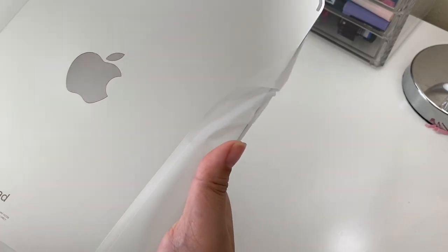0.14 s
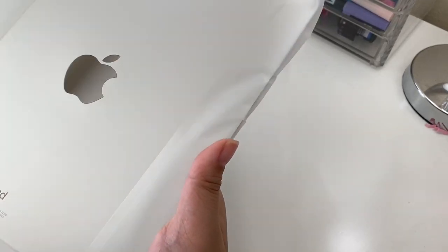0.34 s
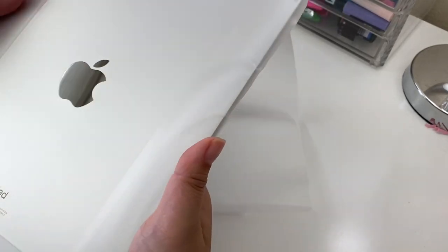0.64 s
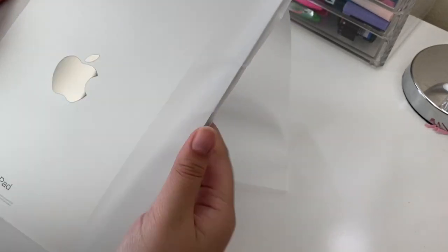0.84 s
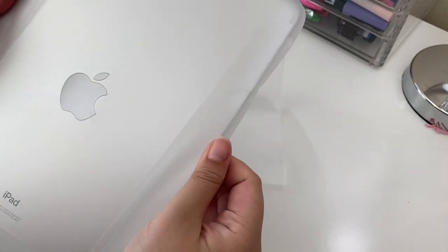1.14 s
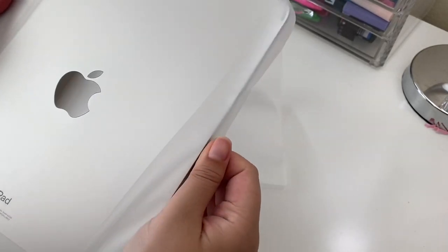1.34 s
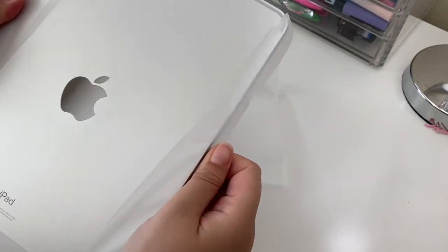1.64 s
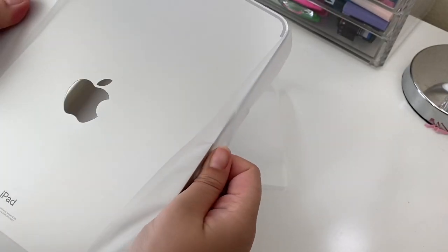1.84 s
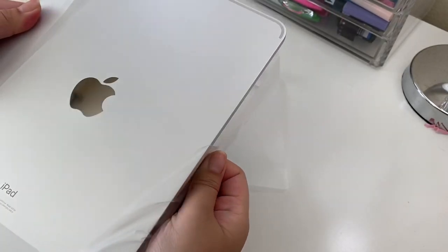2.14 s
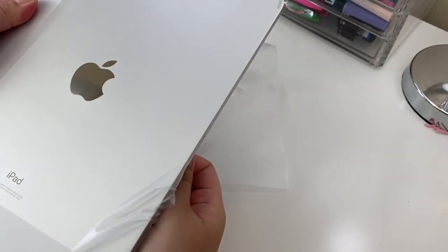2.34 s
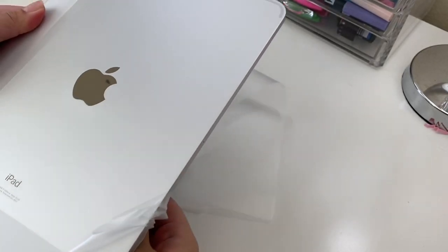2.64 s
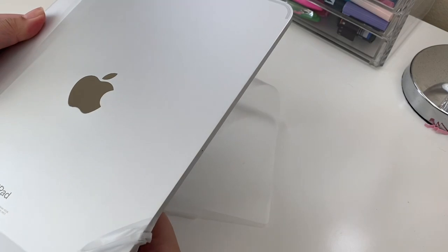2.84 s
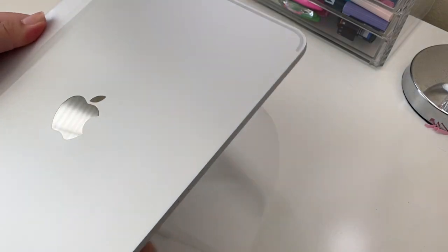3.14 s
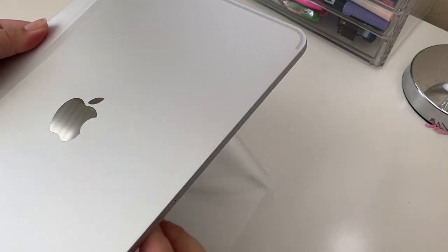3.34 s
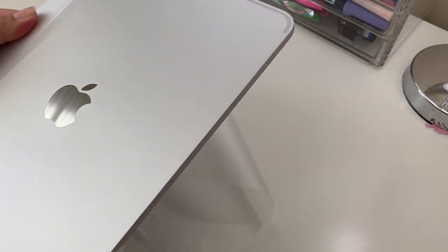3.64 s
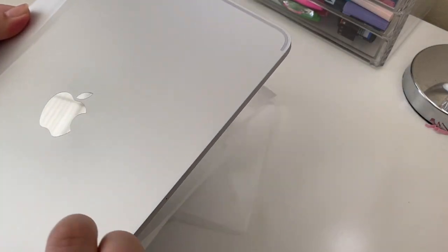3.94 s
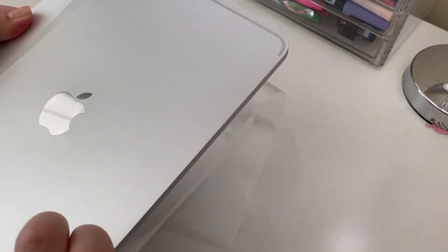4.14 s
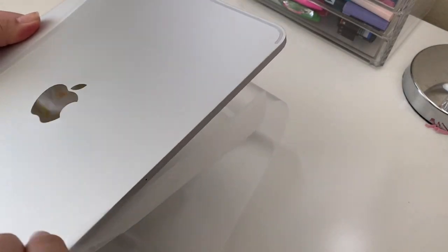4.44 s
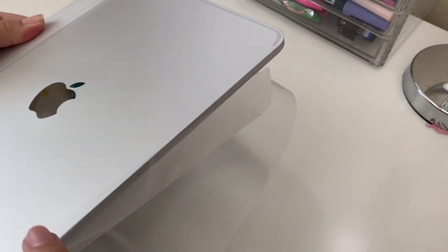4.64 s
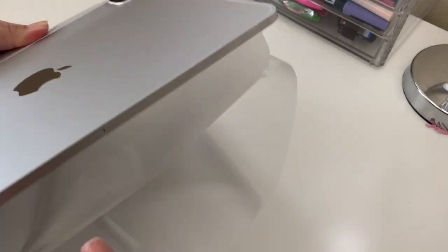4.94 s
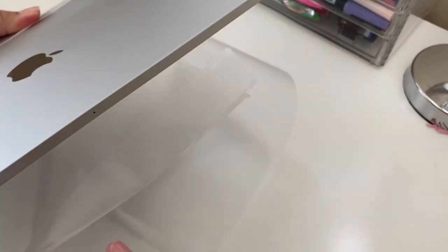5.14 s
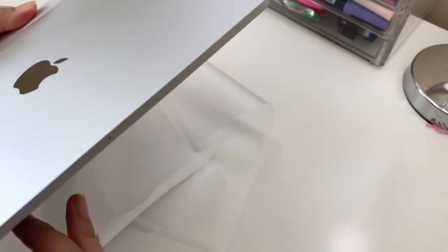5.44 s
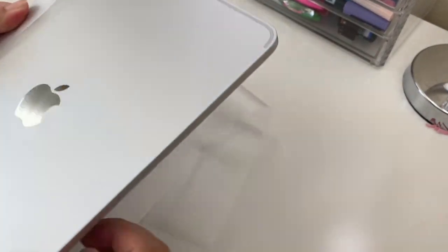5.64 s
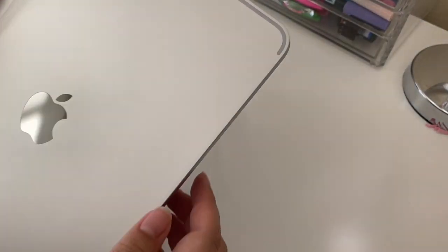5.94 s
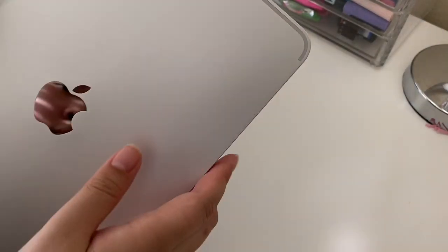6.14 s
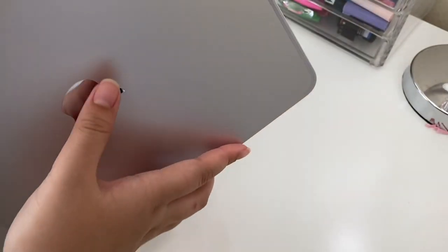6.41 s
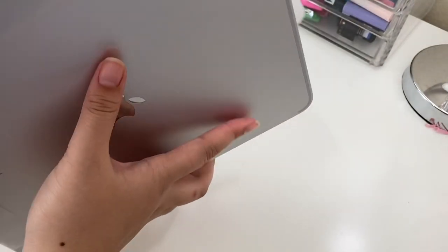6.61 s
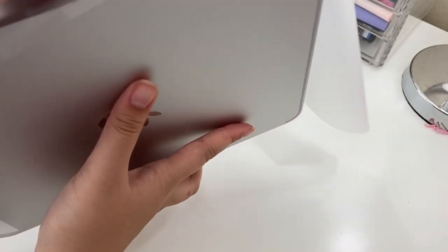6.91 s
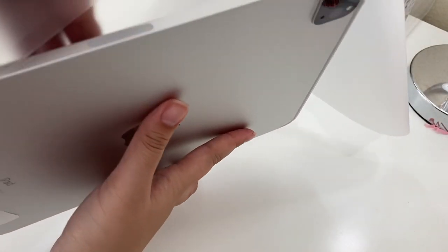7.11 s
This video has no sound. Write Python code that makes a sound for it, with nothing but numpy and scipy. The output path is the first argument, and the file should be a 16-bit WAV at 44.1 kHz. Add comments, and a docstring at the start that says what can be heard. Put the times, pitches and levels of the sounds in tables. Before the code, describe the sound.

Thin plastic film is peeled off a metal tablet, crackling and rustling in irregular bursts close up in a quiet room.

```python
"""Sharp snaps and a sliding rustle: thin plastic wrap pulled off a metal tablet, close to a phone's mics.
Creases buckle and ring the panels beside them; between snaps the sheet hisses, ticks and pops hollowly.
Fingers rub, and a palm slaps the metal back once.
A quiet room rumbles underneath and answers with a short tail."""
import sys
import numpy as np
from scipy import signal
from scipy.fft import rfft, irfft, next_fast_len
from scipy.io import wavfile
from scipy.ndimage import uniform_filter1d, map_coordinates

SR = 44100
rng = np.random.default_rng(int(sys.argv[2]) if len(sys.argv) > 2 else 0)


def file_out(sig):
    """Save sig as 16-bit WAV at sys.argv[1]."""
    # one column per channel
    cols = np.atleast_2d(sig).T
    # limit, then scale
    lim = np.clip(cols, -1, 1)
    pcm = np.round(lim * 32767).astype(np.int16)
    wavfile.write(sys.argv[1], SR, pcm)


N = 320607

# buckling creases: (time [s], level [dB], treble [dB], panel resonance [Hz])
CREASES = [(0.0562, -24.5, -8.5, 3510), (0.1091, -31.5, -4, 3270), (0.162, -30.5, 2, 6400),
           (0.208, -19, 2, 2540), (0.3146, -24.5, 5, 2600), (0.3797, -35, 2.5, 5300),
           (0.5156, -39.5, -0.5, 4380), (0.549, -44, 3.5, 3950), (0.579, -47, 2, 1400),
           (0.606, -46, -3, 1120), (0.6908, -39.5, 2.5, 5560), (0.737, -48, -3, 1500),
           (0.898, -45, -35, 4830), (0.955, -45, -2.5, 5000), (1.004, -29.5, 6.5, 6800),
           (1.013, -23.5, -28, 6080), (1.1559, -32, 4, 5660), (1.181, -33, 1.5, 7750),
           (1.2053, -24.5, -18, 3940), (1.245, -33.5, -3, 1990), (1.251, -36.5, -12, 880),
           (1.335, -29, 5.5, 4300), (1.340, -33.5, 3, 3130), (1.3945, -44, 9.5, 5400),
           (1.549, -36, 4, 1150), (1.601, -36, -9, 9100), (1.719, -32.5, -13, 3380),
           (1.752, -28.5, 15.5, 10100), (1.762, -38, 6, 4540), (1.8598, -19.5, -14.5, 5080),
           (1.9905, -27, 11.5, 8900), (2.049, -24.5, 3.5, 2200), (2.1002, -20, -11.5, 7060),
           (2.1304, -27.5, 11.5, 8320), (2.176, -23.5, -11, 7930), (2.2159, -23.5, 5.5, 1470),
           (2.2599, -28, 7, 753), (2.352, -23.5, -9, 2130), (2.4334, -31.5, 4, 5640),
           (2.4592, -24.5, -31.5, 3750), (2.466, -22.5, 0, 2264), (2.5449, -34.5, 0, 666),
           (2.6912, -33, 14, 4280), (2.7202, -31, -7, 8470), (2.921, -20.5, 4.5, 3920),
           (3.0376, -31, -7, 4700), (3.088, -34, 0.5, 4040), (3.124, -21.5, 0, 1634),
           (3.199, -26.5, -5.5, 7700), (3.2835, -23, 1, 4680), (3.522, -32, 5, 6000),
           (3.781, -44.5, -0.5, 2010), (3.9465, -48, -42, 1560), (3.9948, -43.5, -3.5, 5480),
           (4.2491, -46.5, -3.5, 910), (4.277, -43.5, -29, 1370), (4.41, -37, -11, 3990),
           (4.4479, -15.5, 26, 7300), (4.5047, -30.5, 19.5, 8200), (4.597, -31, 0, 5470),
           (4.651, -41, -14, 5450), (4.721, -21, 5, 6470), (4.7377, -18, 4.5, 3860),
           (4.789, -19.5, 9.5, 3540), (4.8053, -29.5, 0, 4560), (4.8297, -23, 0, 3400),
           (4.8419, -27.5, 2, 800), (4.869, -37, -5.5, 3040), (4.879, -27, -4, 2580),
           (4.9032, -30, -4, 2030), (4.930, -40.5, -6.5, 3470), (4.9972, -28, 0, 4850),
           (5.0315, -30, 4, 2550), (5.0781, -31.5, 0, 2740), (5.147, -39, -36, 3570),
           (5.2072, -37.5, -40, 3440), (5.27, -37, -10.5, 2910), (5.3037, -24, 3.5, 3520),
           (5.345, -28.5, -1, 1290), (5.4735, -26.5, 4.5, 7000), (5.8038, -52, -34, 1750),
           (6.3486, -31.5, -31, 8350), (6.816, -36.5, 3, 3840), (7.0037, -23, 2.5, 2700),
           (7.0129, -26, 11.5, 3500), (7.082, -37, -10, 4400), (7.137, -22.5, 4.5, 5440),
           (7.1472, -28, -21, 3530)]


def amp(db):
    """dB to gain."""
    return 10 ** (np.asarray(db) / 20)


def unit(x):
    """x at rms 1."""
    return x / np.sqrt(np.mean(x ** 2) + 1e-20)


def along(points, hz):
    """Interpolate (frequency [Hz], value) points on a log axis."""
    f, v = np.transpose(points)
    return np.interp(np.log(hz + 1), np.log(f + 1), v)


def wobble(rate_hz):
    """Smooth random curve, rms 1."""
    knots = rng.standard_normal(int(N * rate_hz / SR) + 4)
    return unit(map_coordinates(knots, [np.arange(N) * rate_hz / SR]))


def filtered(x, response):
    """Apply a complex frequency response."""
    m = next_fast_len(x.shape[-1] + 4096)
    return irfft(rfft(x, m) * response(np.fft.rfftfreq(m, 1 / SR)), m)[..., :x.shape[-1]]


def shelf(hz, corner_hz):
    """Treble share: 0 below the corner, 1 above."""
    return hz ** 4 / (hz ** 4 + corner_hz ** 4)


def rumble():
    """Low building noise, faint air hiss and a wavering hum."""
    # noise spectrum: (frequency [Hz], density [dB])
    spectrum = [(30, -41.5), (42, -9), (55, 2.5), (68, -8.5), (150, -16.5), (400, -33), (15800, -62),
                (16100, -100)]
    hum_hz, waver_hz = 49.4, 6.08
    noise = filtered(rng.standard_normal((2, N)), lambda f: amp(along(spectrum, f)))
    hum = np.sin(2 * np.pi * np.cumsum(hum_hz + waver_hz * wobble(rate_hz=4.6)) / SR)
    return amp(-57) * unit(noise) + amp(-58.5) * hum


def room(x):
    """Short diffuse tail; the treble dies first."""
    # room decay: (frequency [Hz], t60 [s])
    decay = [(300, 0.32), (2000, 0.23), (12000, 0.18)]
    hz, t, z = signal.stft(rng.standard_normal((2, SR // 2)), SR, nperseg=256)
    tail = signal.istft(z * amp(-60 * t / along(decay, hz)[:, None]), SR, nperseg=256)[1]
    delayed = np.pad(x, ((0, 0), (130, 0)))
    return signal.fftconvolve(delayed, tail / np.linalg.norm(tail[0]), axes=1)[:, :N]


def rubs():
    """Strokes of skin or film, each in one broad resonance."""
    # strokes: (midpoint [s], length [s], level [dB], resonance [Hz])
    strokes = [(2.709, 0.15, -47.5, 1880), (5.608, 0.093, -57.5, 1910), (5.95, 0.25, -65.5, 4630),
               (6.475, 0.086, -49, 1300)]
    out, t = np.zeros((2, N)), np.arange(N) / SR
    for mid_s, length_s, db, hz in strokes:
        band = filtered(rng.standard_normal((2, N)), lambda f: f * hz / (hz * hz - f * f + .25j * f * hz))
        swell = np.sqrt(np.clip(1 - (2 * (t - mid_s) / length_s) ** 2, 0, 1))
        out += amp(db) * swell * unit(band)
    return out


def drag():
    """Time, hiss, tick and treble curves: steady drag plus the stir that settles after each snap."""
    # drag of sheet on metal: (time [s], level [dB], treble [dB])
    pull = [(0.0, -44, -1.5), (0.15, -42.5, -7.5), (0.4, -58, 0), (0.7, -62.5, 12), (0.94, -55.5, -1.5),
            (1.49, -60.5, -13.5), (1.63, -52.5, 0.5), (1.98, -47.5, -5.5), (2.43, -40, -1),
            (2.61, -53.5, -6), (2.85, -50.5, -12.5), (3.0, -48.5, -12), (3.12, -36.5, 4), (3.37, -47, -6.5),
            (3.51, -45.5, 5), (3.731, -52, 9), (3.87, -60.5, -7), (4.33, -65.5, 3), (4.39, -47, 1.5),
            (4.57, -52, -3), (5.18, -48, -17.5), (5.52, -48, -10), (6.19, -73, 3.5), (6.505, -40, -14.5),
            (6.54, -49, -6), (6.7, -51, 0.5), (6.8, -43.5, 9), (7.27, -44, -3.5)]
    stir_db, rise_s, settle_s = -20.5, 0.0016, 0.02
    t = np.arange(0, N, 64) / SR
    pull_s, pull_db, treble_db = np.transpose(pull)
    snap_s, snap_db, snap_treble_db, _ = np.transpose(CREASES)[..., None]
    age_s = t - snap_s
    stirs = amp(snap_db + stir_db) ** 2 * np.clip(age_s / rise_s, 0, 1) * np.exp(-abs(age_s) / settle_s)
    steady, stir = amp(np.interp(t, pull_s, pull_db)) ** 2, stirs.sum(axis=0)
    power = steady + stir
    crumple = steady / 3 + amp(0.5) * stir  # a shaken sheet ticks more than a gliding one
    colour_db = 0.41 * (stirs * snap_treble_db).sum(axis=0) / power  # bright snap, bright stir
    return t, 10 * np.log10(power), 10 * np.log10(crumple), np.interp(t, pull_s, treble_db) + colour_db


def slide():
    """The sliding sheet hisses in drifting coloured patches; small creases tick, louder with the pull."""
    # friction spectrum: (frequency [Hz], density [dB])
    spectrum = [(150, 0.5), (500, -3.5), (3500, -5.5), (8000, -5.5), (12500, -9.5), (15600, -5.5),
                (16100, -66)]
    # resonances colouring the hiss: (centre [Hz], half width [Hz], added gain [dB])
    resonances = [(1950, 110, 0), (3600, 160, -4), (4950, 300, -3)]
    patch_db, flutter_db, tick_count = 2.4, 1.5, 800
    drag_s, level_db, crumple_db, treble_db = drag()
    hz, t, z = signal.stft(rng.standard_normal((2, N)), SR, nperseg=256)
    patches = uniform_filter1d(rng.standard_normal(z.shape[1:]), size=2, axis=0)
    patches = unit(uniform_filter1d(patches, size=60, axis=1))
    tilt_db = shelf(hz, 2300)[:, None] * np.interp(t, drag_s, treble_db)
    hiss = signal.istft(z * amp(patch_db * patches + tilt_db), SR, nperseg=256)[1][:, :N]
    peaks = lambda f: 1 + sum(amp(db) / (1 + ((f - c) / w) ** 2) for c, w, db in resonances)
    hiss = filtered(hiss, lambda f: amp(along(spectrum, f)) * peaks(f))
    hiss *= amp(np.interp(np.arange(N) / SR, drag_s, level_db) + 2 + flutter_db * wobble(rate_hz=70))
    place, strength, dullness, pitch = rng.random((tick_count, 4)).T
    tick_s = place * (N - 1) / SR
    tick_db = 1.27 * np.interp(tick_s, drag_s, crumple_db) + 10 + 10 * strength ** 5  # few are strong
    tick_treble_db = np.interp(tick_s, drag_s, treble_db) - 8 * dullness
    return hiss + buckle(tick_s, tick_db, tick_treble_db, panel_hz=600 * 11 ** pitch, samples=800)


def flaps():
    """The loose sheet flexes: hollow pops of a few cycles, too limp to hold a pitch."""
    # flexes: (time [s], level [dB], pitch [Hz])
    flexes = [(0.2113, -23.5, 550), (2.1703, -14.5, 712), (2.219, -16, 1474), (2.2595, -21.5, 939),
              (2.473, -35, 114), (6.919, -32.5, 407), (7.007, -31, 382), (7.136, -32.5, 298)]
    out, t = np.zeros(N + SR), np.arange(SR // 5) / SR
    for start_s, db, hz in flexes:
        cycles = hz * t
        wander_rad = 0.75 * np.sqrt(hz / SR) * np.cumsum(rng.standard_normal(len(t)))
        push = amp(db) * cycles * np.exp(1 - cycles / 0.81)
        out[round(start_s * SR):][:len(t)] += push * np.sin(2 * np.pi * cycles + wander_rad)
    return out[:N]


def slap():
    """A soft palm excites the low modes of the metal back, the lowest last."""
    # modes of the back: (frequency [Hz], relative level [dB], t60 [s])
    modes = [(82, -4, .24), (169, -4, .16), (257, -9, .13), (318, -13, .13)]
    start_s, level_db, skin_t60_s = 6.4035, -17.5, 0.12
    t = np.maximum(np.arange(N) / SR - start_s, 0)
    ring = np.zeros(N)
    for hz, db, t60_s in modes:
        onset = 1 - np.exp(-(hz * t / 0.8) ** 2)
        ring += onset * amp(db - 60 * t / t60_s) * np.sin(2 * np.pi * hz * t)
    skin = rng.standard_normal((2, N)) * amp(5 - 60 * t / skin_t60_s) * (t > 0)
    skin = filtered(skin, lambda f: 1j * f / (300 + 1j * f) / (1 + 1j * f / 900) ** 2)
    return amp(level_db) * (ring + skin)


def buckle(start_s, db, treble_db, panel_hz, samples):
    """One burst per crease: a jagged release rings the flat panel beside it."""
    rise_s, spike_t60_s, edge_t60_s = 0.00061, 0.004, 0.02
    split_hz, spread_s, max_echo_s = 4800, 0.002, 0.0012145
    t, count = np.arange(samples) / SR, len(start_s)
    db, treble_db, panel_hz = (c[:, None, None] for c in (db, treble_db, panel_hz))
    octaves = np.log2(5000 / panel_hz)  # a big panel rings lower, stronger and longer
    ring_db, body_t60_s, width_hz = 1 + 2 * octaves, 0.027 + 0.017 * octaves, 0.6 * panel_hz
    stutter = amp(3.1 * np.sqrt(10) * uniform_filter1d(rng.standard_normal((count, 1, samples)), size=30))
    noise = rng.standard_normal((count, 2, samples)) * (1 - np.exp(-t / rise_s))
    spike = 8 * amp(-60 * t / spike_t60_s)  # the first release is the hardest
    body = noise * (spike + stutter * amp(-60 * t / body_t60_s))
    edge = noise * (spike + stutter * amp(-60 * t / edge_t60_s))
    # buckling spectrum: (frequency [Hz], density [dB])
    spectrum = [(150, 5), (1200, -2), (3000, 0.5), (6000, -1), (12500, -1.5), (15500, -5.5), (16800, -23.5)]
    crack = lambda f: amp(along(spectrum, f))
    lows = lambda f: (1 - shelf(f, split_hz)) * shelf(f, 0.12 * panel_hz)  # a small panel moves no bass
    ring = lambda f: amp(ring_db) * 1j * f * width_hz / (panel_hz ** 2 - f * f + 1j * f * width_hz)
    # bending waves carry the bass slowly
    dispersion = lambda f: np.exp(-4j * np.pi * spread_s * (np.sqrt(1000 * f) - f / 5))
    burst = filtered(body, lambda f: dispersion(f) * (crack(f) * lows(f) + ring(f)))
    burst += filtered(edge, lambda f: crack(f) * amp(treble_db) * shelf(f, split_hz))
    echo_s = max_echo_s * rng.random((count, 1, 1))  # metal close behind: hollow colour
    burst = filtered(burst, lambda f: 1 - 0.51 * np.exp(-2j * np.pi * f * echo_s))
    onset_rms = np.sqrt(np.mean(burst[..., :180] ** 2, axis=(1, 2), keepdims=True))
    burst *= amp(db) / onset_rms
    at = (np.round(start_s * SR).astype(int)[:, None] + np.arange(samples)).ravel()
    return np.array([np.bincount(at, burst[:, k].ravel(), N + samples)[:N] for k in range(2)])


def snaps():
    """The loud creases; each slips a little just before it lets go."""
    start_s, db, treble_db, panel_hz = np.transpose(CREASES)
    lead_s = 0.0015 + 0.002 * rng.random(len(start_s))
    release = buckle(start_s, db, treble_db, panel_hz, samples=2500)
    slip = buckle(start_s - lead_s, db - 21.5, treble_db, panel_hz, samples=800)
    return release + slip


def scene():
    """Two channels of all sources; snaps, slap and flaps excite the room."""
    hits = snaps() + slap() + flaps()
    return hits + amp(-11.5) * room(hits) + slide() + rubs() + rumble()


def record(dry):
    """The phone blends its ports: bass and top alike, middle wide and leftward; peaks saturate."""
    # port blend: (frequency [Hz], left-right likeness [0..1])
    likeness = [(100, 0.97), (600, 0.54), (1500, 0.063), (3000, 0.18), (9000, 0.89)]
    # port balance: (frequency [Hz], left over right [dB])
    balance = [(150, -0.5), (1200, 3), (5500, 4), (7000, 0)]
    # port phase: (frequency [Hz], left lead [rad])
    lead = [(0, 0), (900, .7), (1700, .2), (2900, 1.1), (5000, .2), (6500, 0), (15700, -15.7)]
    ceiling, cutoff_hz = 0.75, 16800
    mid_side = np.array([dry[0] + dry[1], dry[0] - dry[1]]) / np.sqrt(2)
    width_rad = lambda f: np.arccos(np.clip(along(likeness, f), 0, 1)) / 2
    mid, side = filtered(mid_side, lambda f: np.array([np.cos(width_rad(f)), np.sin(width_rad(f))]))
    half = np.array([[0.5], [-0.5]])
    phase = lambda f: np.exp(1j * half * np.interp(f, *np.transpose(lead)))
    ports = filtered(np.array([mid + side, mid - side]), lambda f: amp(half * along(balance, f)) * phase(f))
    saturated = ports / (1 + np.abs(ports / ceiling) ** 4) ** 0.25
    return filtered(saturated, lambda f: f < cutoff_hz)


dry = scene()
out = record(dry)
file_out(out)
```